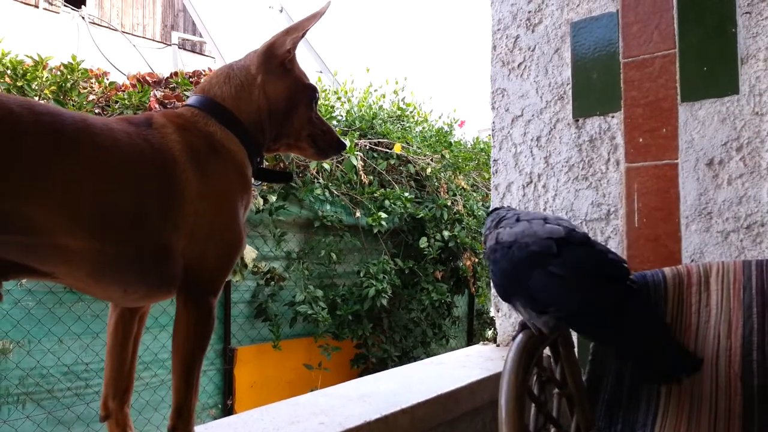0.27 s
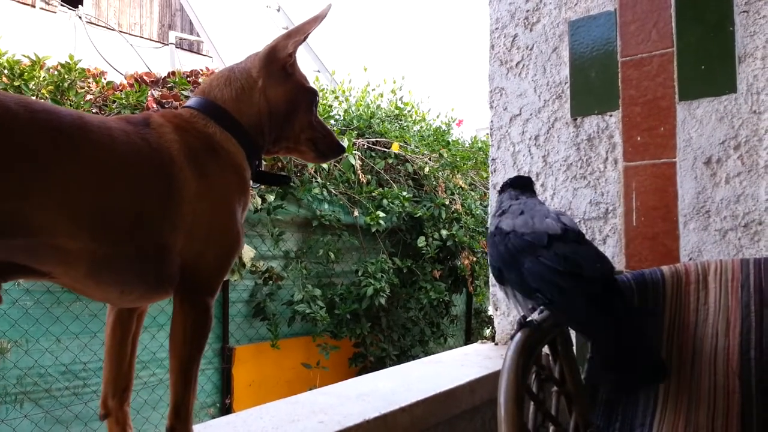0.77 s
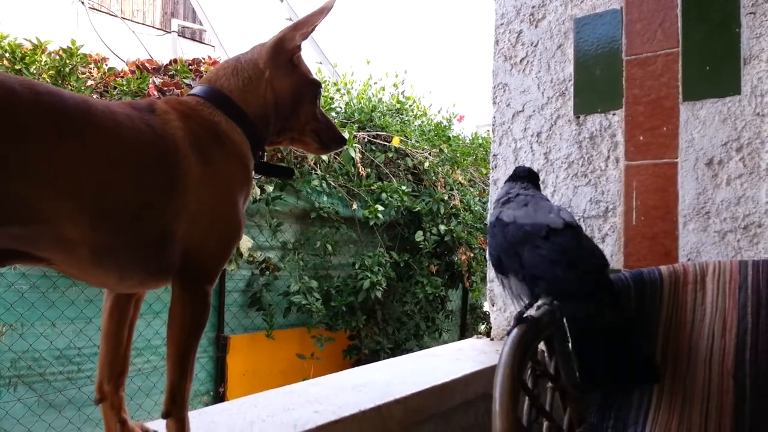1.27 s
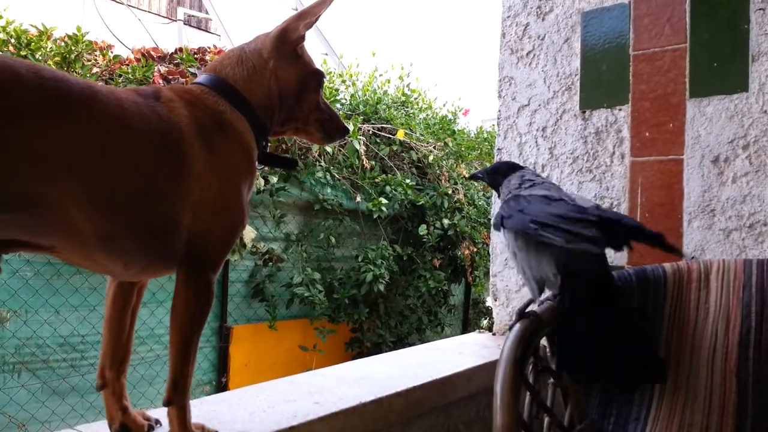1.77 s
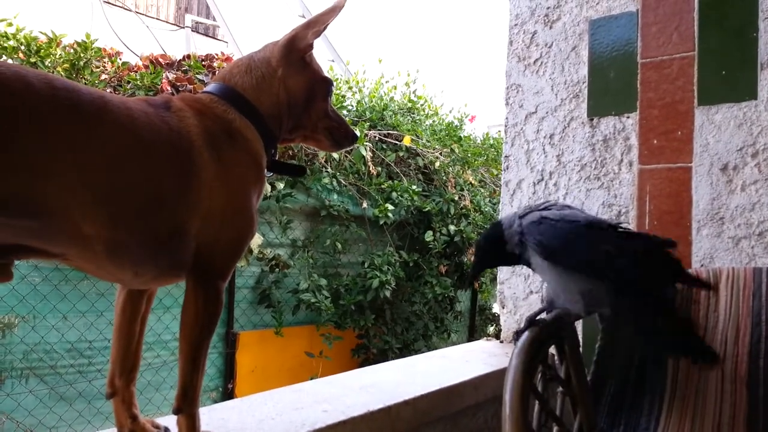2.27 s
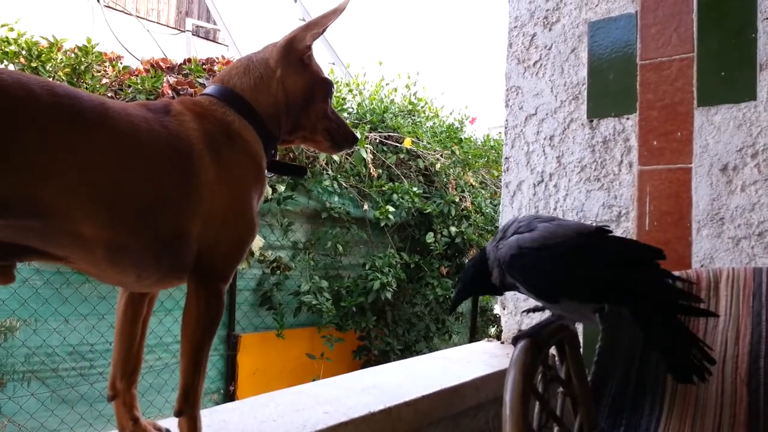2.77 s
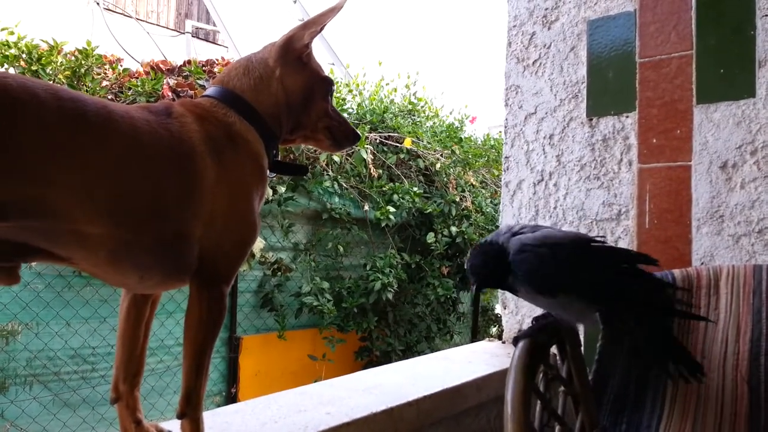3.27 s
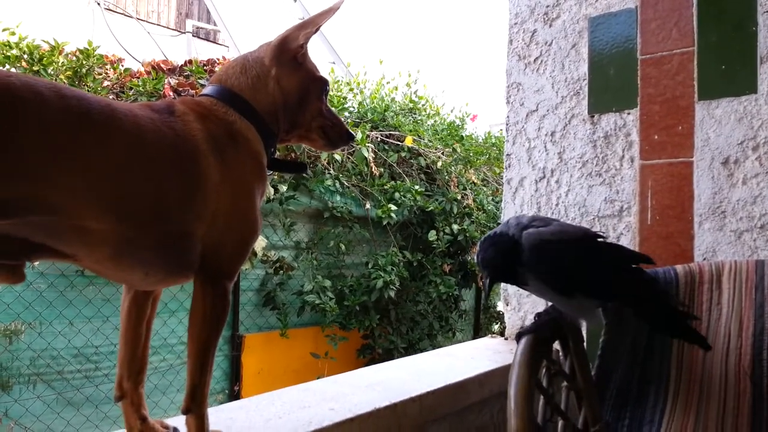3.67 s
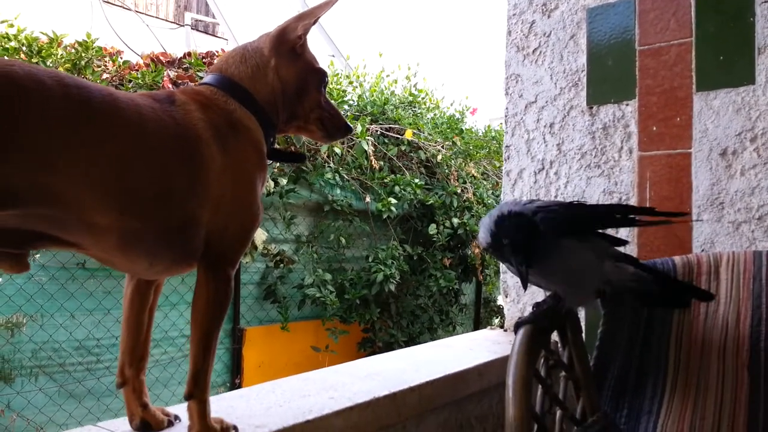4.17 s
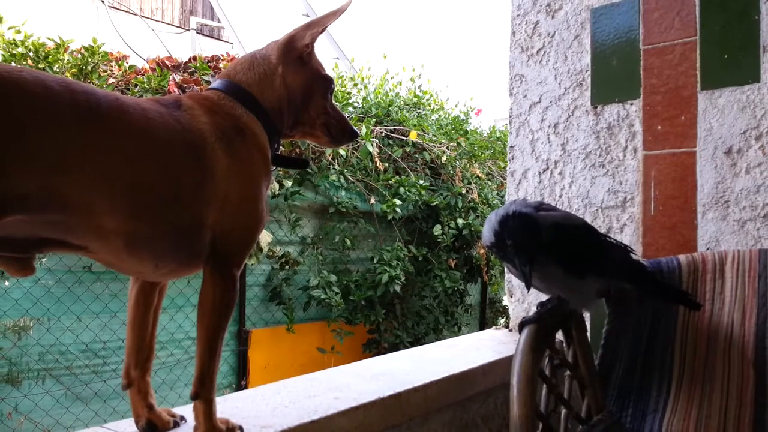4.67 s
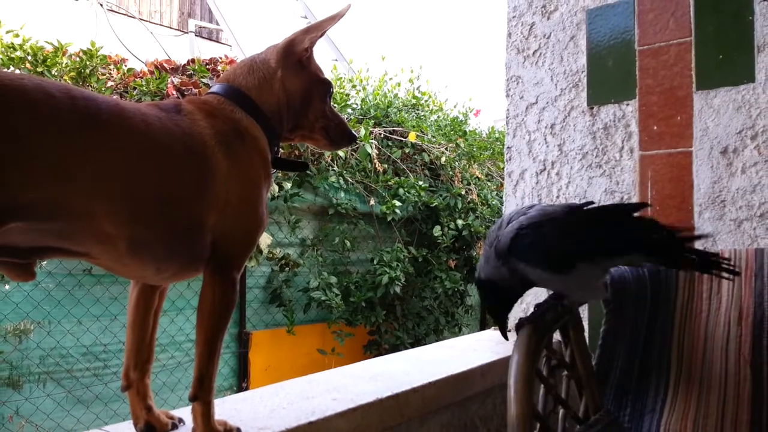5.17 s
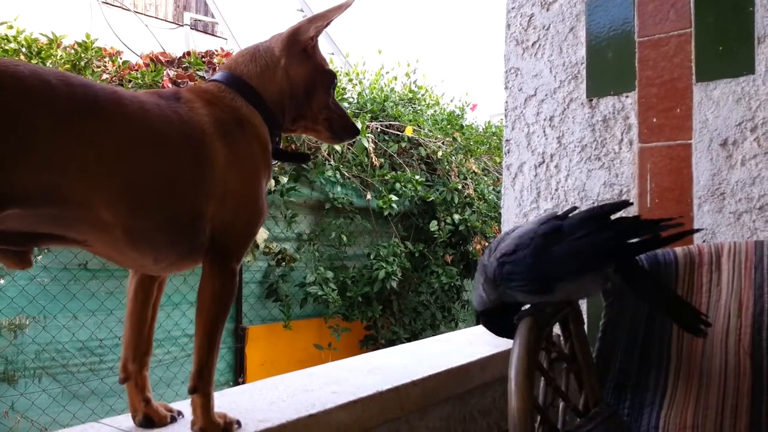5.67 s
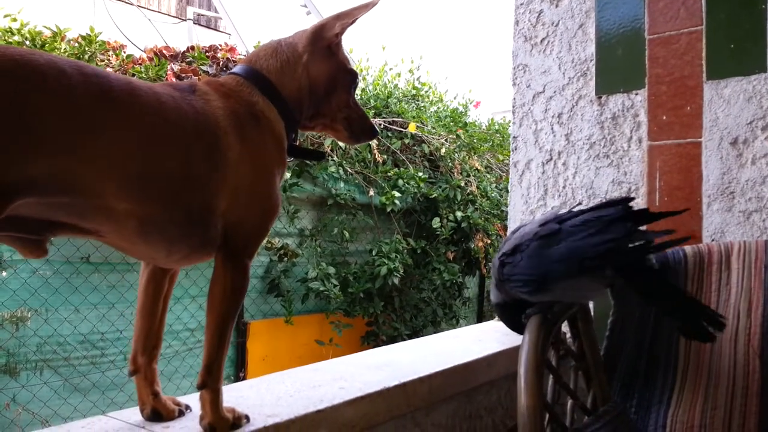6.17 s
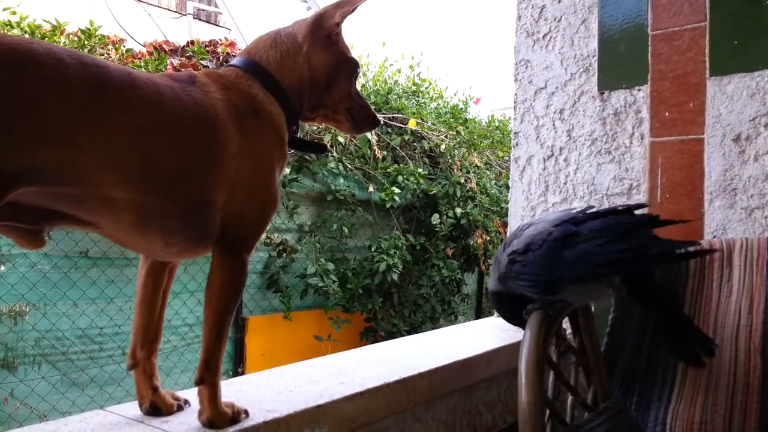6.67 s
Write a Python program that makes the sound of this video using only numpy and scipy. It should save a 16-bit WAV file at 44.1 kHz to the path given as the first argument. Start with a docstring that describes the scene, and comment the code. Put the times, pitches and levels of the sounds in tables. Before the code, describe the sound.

On a balcony, close to the microphone, a crow shifts on a wicker chair. Soft feather rustles and small claw clicks come first, then a pair of loud, dry knocks, and another pair shortly after. A quieter stretch of rustling follows, before a busier burst of pecks, scrapes and dull frame thumps. Faint far traffic and steady hiss lie underneath, with a short diffuse echo.

```python
"""Over far traffic and even microphone hiss, both filtered noise, a crow shifts on a wicker chair on a balcony.
Feathers rustle first, as dense coloured grains; claws and beak then knock the cane, clicks ringing its modes.
Louder knocks come in pairs near 2.5 and 2.9 s; from about 5 s the bird pecks again and its weight jolts the frame.
From 5.4 s the beak also scrapes the weave, as dense slips on the same modes; near 5.96 s the low noise rises too.
Throughout, the balcony answers with a short diffuse tail of decaying noise."""
import sys
import numpy as np
from scipy import signal
from scipy.fft import rfft, irfft, next_fast_len
from scipy.io import wavfile
from scipy.ndimage import uniform_filter1d

SR = 44100
rng = np.random.default_rng(int(sys.argv[2]) if len(sys.argv) > 2 else 0)


def level_to_linear(level):
    """Convert decibel levels to linear amplitude factors, elementwise."""
    exponent = np.asarray(level, float) / 20
    return 10 ** exponent


def master(y):
    """Save y as 16-bit WAV."""
    cut = np.clip(np.atleast_2d(y).T, -1, 1)
    pcm = np.round(cut * 32767)  # scale
    wavfile.write(sys.argv[1], SR, pcm.astype(np.int16))


N = 305613
TOP_HZ = 14600   # surroundings, rubbing and tail end here
SIDE = np.array([[1], [-1]])   # left, right


def rms_one(x):
    """Normalisation: scale to unit root mean square."""
    return x / np.sqrt(np.mean(x ** 2) + 1e-20)


def at_hz(points, hz):
    """Logarithmic pitch scale: interpolate (frequency [Hz], value) points over log frequency."""
    point_hz, values = np.array(points).T
    return np.interp(np.log(hz), np.log(point_hz), values)


def drift(rate):
    """Slow random modulation: normal draws at the given rate [1/s], joined by straight lines."""
    steps = rng.standard_normal(int(N / SR * rate) + 3)
    return np.interp(np.arange(N) / SR * rate, np.arange(len(steps)), steps)


def coloured(x, gain):
    """Linear filtering: multiply the spectrum by a gain given as a function of frequency [Hz]."""
    size = next_fast_len(N + SR)
    hz = np.maximum(np.arange(size // 2 + 1) * SR / size, 1)
    return irfft(rfft(x, size) * gain(hz), size)[..., :N]


def grains(per_s, spread_db):
    """Shot noise: random clicks of uneven size and sign."""
    sizes = level_to_linear(spread_db * np.minimum(rng.exponential(1, N), 4))
    signs = rng.choice([-1, 1], N)
    return sizes * signs * (rng.random(N) < per_s / SR)


def strokes(rows, rise_db_per_s, fall_db_per_s):
    """Exponential envelopes: strokes rise, hold and fall at steady dB rates, and add in power."""
    t = np.arange(N) / SR
    power = 0
    for s, held_s, db in rows:
        before_s = np.maximum(s - t, 0)
        after_s = np.maximum(t - s - held_s, 0)
        down_db = rise_db_per_s * before_s + fall_db_per_s * after_s
        power = power + level_to_linear(db - down_db) ** 2
    return np.sqrt(power)


def ring(clicks, hz, t60):
    """Damped resonance: clicks set a mode ringing; a bending strand radiates little below its pitch."""
    radius, w = level_to_linear(-60 / (t60 * SR)), 2 * np.pi * hz / SR
    highpass = [1, -2 * np.exp(-w / 2), np.exp(-w)]   # double real pole
    push = signal.lfilter([1, -2, 1], highpass, clicks + 1e-18)
    return signal.lfilter([.5, 0, -.5], [1, -2 * radius * np.cos(w), radius * radius], push)


# spectrum of the surroundings: (frequency [Hz], relative gain [dB])
AIR_SPECTRUM = [(18, -40), (30, -17.5), (80, -7.5), (161, -2), (208, -0.5), (418, -4.5), (1180, -8),
                (1270, -9.5), (2490, -15), (2900, -15.5), (4870, -18), (6300, -21), (10800, -19.5),
                (14400, -21.5)]
# left-right likeness, negative values played as none: (frequency [Hz], likeness [1])
AIR_LIKENESS = [(60, 0.48), (180, 0.5), (550, 0.42), (1650, 0.018), (4970, -0.11), (15000, -0.31)]
# balance of the surroundings: (frequency [Hz], left over right [dB])
AIR_BALANCE = [(60, 3.5), (180, 3.5), (550, -1.5), (1650, -3), (4970, -5), (15000, -4)]
# slow level of the low background, with a brief rise as the chair is scraped near 5.96 s:
# (time [s], level [dB])
LOW_BACKGROUND = [(0.0, -53), (2.5, -54.5), (3.2, -54.5), (5.4, -56), (5.96, -53.5), (6.4, -56), (6.7, -55),
                  (6.93, -52)]


def surroundings(hiss_hz=2000, hiss_db=-53.5):
    """Partially coherent noise: the low background changes slowly in level, while the hiss above stays even."""
    def shape(hz):
        return level_to_linear(at_hz(AIR_SPECTRUM, hz) + at_hz(AIR_BALANCE, hz) * SIDE / 2) * (hz < TOP_HZ)

    def alike(hz):
        return np.clip(at_hz(AIR_LIKENESS, hz), 0, 1)

    shared, apart = rng.standard_normal((2, N))
    air = coloured(shared, lambda hz: shape(hz) * np.sqrt(1 + alike(hz)))
    air += coloured(apart, lambda hz: shape(hz) * np.sqrt(1 - alike(hz)) * SIDE)   # opposite signs
    lows = coloured(air, lambda hz: 1 / (1 + (hz / hiss_hz) ** 2))
    hiss = air - lows
    scale = 1 / np.sqrt(np.mean(lows ** 2))   # one scale for both, set by the lows
    low_level = level_to_linear(np.interp(np.arange(N) / SR, *np.transpose(LOW_BACKGROUND)))
    return scale * low_level * lows + level_to_linear(hiss_db) * scale * hiss


# decay of the balcony's tail by band: (centre frequency [Hz], t60 [s])
BALCONY_DECAY = [(300, 0.44), (700, 0.22), (1500, 0.26), (3000, 0.072), (5000, 0.18), (8000, 0.15),
                 (13000, 0.16)]


def balcony(x, gap_s=0.00045, level_db=-7.5):
    """Diffuse reverberation: walls, floor and weave scatter sound into a tail that dies band by band,
    unlike at each port."""
    age = np.arange(SR // 2) / SR
    tail = 0
    for hz, t60 in BALCONY_DECAY:
        band = signal.butter(1, [hz / 1.45, hz * 1.45], "band", fs=SR, output="sos")
        noise = signal.sosfilt(band, rng.standard_normal((2, len(age))))
        tail = tail + noise * level_to_linear(-60 * age / t60)
    tail = tail * (1 - np.exp(-age / gap_s))   # soft onset
    response = rms_one(tail) / np.sqrt(len(age))
    return level_to_linear(level_db) * signal.fftconvolve(x, response, axes=1)[:, :N]


# balance of the chair at the two ports: (frequency [Hz], left over right [dB])
CHAIR_BALANCE = [(60, -13), (130, 0), (290, -3), (640, -3), (1410, -5), (3100, -10.5), (6820, -9.5),
                 (15000, 1)]
# phase by which the left port leads: (frequency [Hz], phase [rad])
LEFT_LEAD = [(300, .1), (1000, 0.38), (2500, 1.42), (4100, 1.47), (5250, 2.4), (6700, 4.67), (9100, 5.75),
             (12200, 8.25)]


def toward_microphones(x):
    """Interchannel level and phase difference: most bands favour the right port; the left leads in phase."""
    def port(hz):
        level = level_to_linear(at_hz(CHAIR_BALANCE, hz) * SIDE / 2 + 1.5)
        return level * np.exp(.5j * at_hz(LEFT_LEAD, hz) * SIDE)

    return coloured(x, port)


# feathers brush as the bird turns and flicks its wings: (full from [s], held [s], relative level [dB])
RUSTLES = [(0.07, .005, -61), (0.155, 0.021, -58.5), (0.475, .01, -54), (0.495, 0.022, -48.5),
           (0.55, .01, -50), (0.585, 0.034, -57.5), (0.66, .16, -61), (1.068, .1, -53.5),
           (1.275, 0.062, -59.5), (1.645, 0.1, -52.5), (1.79, 0.11, -61), (2.116, 0.052, -53),
           (2.215, .005, -57), (2.36, 0.036, -59.5), (3.0, 0.087, -62.5), (3.2, .01, -68),
           (3.268, 0.06, -55), (3.45, .09, -64), (4.01, 0.08, -56.5), (4.15, 0.069, -59),
           (4.55, 0.036, -66), (4.654, 0.004, -48), (4.742, .01, -61.5), (4.915, 0.12, -57.5),
           (5.06, 0.023, -55.5), (5.15, 0.15, -63), (5.315, .01, -56)]
# colour of the barbs before a low cut: (frequency [Hz], relative gain [dB])
FEATHER_COLOUR = [(530, -33), (900, 5), (1030, 7), (1420, -3.5), (2230, 1.5), (3180, -2), (4760, -1),
                  (10000, -13), (14000, -12)]


def rustles():
    """Friction noise: fine barbs rub as dense grains with a fluttering level."""
    barbs = coloured(grains(9000, 2.7), lambda hz: level_to_linear(at_hz(FEATHER_COLOUR, hz)) / (1 + (1500 / hz) ** 2))
    flutter = level_to_linear(2.0 * drift(40))
    envelope = strokes(RUSTLES, rise_db_per_s=598, fall_db_per_s=270)
    return flutter * envelope * rms_one(barbs)


# modes of the chair, shared with contacts(): (frequency [Hz], relative level [dB], nominal t60 [s])
CHAIR_MODES = [(307.5, 1, 0.11), (486, -3.5, 0.045), (725, 2.5, 0.027), (986, 6, 0.032), (1142, 1.5, 0.043),
               (1451, -2.5, 0.052), (1828, 0.5, 0.021), (2344, -2, 0.019), (2620, -4, 0.027),
               (3068, -2.5, 0.026), (3564, -2.5, 0.026), (3710, -3, 0.016), (4160, -1, 0.027),
               (4582, 1, 0.018), (4780, -7, 0.018), (5040, -2, 0.024), (5714, 1, 0.0087),
               (6250, -3.5, 0.0089), (7330, -1.5, 0.0057), (7930, -1.5, 0.0035), (10040, 1, 0.0027),
               (10280, -7.5, 0.0033), (11270, -11.5, 0.0028), (12640, -10.5, 0.0045)]
# the beak drags over the weave: (full from [s], held [s], relative level [dB])
SCRAPES = [(5.42, 0.057, -55.5), (5.475, 0.0055, -53.5), (5.607, 0.0032, -45.5), (5.658, 0.025, -49.5),
           (5.7, 0.023, -56), (5.76, 0.0045, -54), (5.875, 0.012, -39), (5.955, 0.081, -43),
           (6.08, 0.03, -49.5), (6.15, .14, -58.5)]


def scrapes(slips_per_s=2500):
    """Stick-slip excitation: dense small slips of the beak excite the chair modes."""
    slips = grains(slips_per_s, 2.5) * level_to_linear(1.8 * drift(90))   # the beak catches and lets go
    # (frequency [Hz], lift of the modes [dB])
    tilt = [(300, -3), (460, 1.5), (800, 6), (1200, 0), (1800, -20), (2400, 14), (3100, 11.5),
            (3750, 5.5), (4800, 7.5), (5600, -15), (6500, -2), (9500, -3), (12000, -16)]
    sound = 0
    for hz, db, t60 in CHAIR_MODES:
        sound = sound + level_to_linear(db + at_hz(tilt, hz)) * ring(slips, hz, 0.77 * t60)   # shorter ringing
    envelope = strokes(SCRAPES, rise_db_per_s=690, fall_db_per_s=380)
    return envelope * rms_one(sound)


# pitch of the strand under claw or beak: (from [s], frequency [Hz])
STRANDS = [(0.0, 3100), (0.555, 4720), (1.5, 4000), (2.2, 4600), (2.35, 3230), (2.8, 4020), (4.9, 5200),
           (5.0, 3420), (5.3, 4500), (5.63, 3130), (5.82, 4440), (6.0, 4460), (6.3, 1430), (6.45, 2940)]


def strand_db(s, hz, lift_db=6, width_octaves=.07):
    """Local resonance: modes near the pitch of the strand touched at that time are lifted."""
    own_hz = [pitch_hz for start, pitch_hz in STRANDS if start <= s][-1]
    octaves_off = np.log2(hz / own_hz)
    return lift_db * np.exp(-.5 * (octaves_off / width_octaves) ** 2)


# claw and beak contacts, colour relative to the mid modes:
# (time [s], relative peak [dB], low cane [dB], bright crack [dB], rattle length [s])
CONTACTS = [(0.496, -39.5, -4, -5.5, 0.0042), (0.5336, -37, -17, -3.5, 0.0074),
            (0.5407, -30, -13, -0.5, 0.004), (0.5658, -24, -14, 2.5, 0.0052),
            (1.7265, -35.5, -12, 2, 0.0064), (2.221, -39, -36, 2, 0.0065), (2.404, -36.5, -7, 3, 0.015),
            (2.4543, -9.5, -3, 7.5, 0.0041), (2.4964, -14, -10.5, 7, 0.0054), (2.772, -49, -9, 0.5, 0.004),
            (2.87, -45, -1, 1, 0.0079), (2.889, -19.5, -13, 5.5, 0.0015), (2.918, -12, -12, 9.5, 0.0019),
            (3.056, -46, -3, -1.5, 0.0034), (3.1195, -46.5, -6, -6.5, 0.004),
            (4.974, -37.5, -12, 8, 0.0059), (5.0195, -44.5, -16.5, -5.5, 0.0032),
            (5.312, -43, -11.5, 11.5, 0.004), (5.3863, -34, 1, -5, 0.016), (5.3923, -39, 2, -13, 0.011),
            (5.5763, -24.5, -8, 9, 0.0047), (5.5964, -35.5, -1, 7, 0.01), (5.663, -39, -20, -20, 0.0061),
            (5.7164, -36.5, 2.5, -12.5, 0.0045), (5.766, -32, -4, 2, 0.015), (5.786, -30, -1.5, 10, 0.0048),
            (5.8587, -11, -8, 10, 0.0056), (6.0463, -27, -13, 8, 0.01), (6.055, -23.5, 0, 2, 0.008),
            (6.363, -45.5, 6, 4.5, 0.0031), (6.5057, -15.5, -2.5, 13.5, 0.0049),
            (6.5087, -15.5, -9.5, -14, 0.0049), (6.514, -14.5, -7, 12, 0.0035),
            (6.757, -36.5, -15, 8.5, 0.015), (6.762, -30, 0, 8.5, 0.016), (6.814, -42.5, -4, 11, 0.0083),
            (6.8297, -28.5, -4, 7, 0.0054)]
# the bird's weight jolts the frame, which thumps on its lowest modes: (time [s], relative peak [dB])
JOLTS = [(0.535, -42), (0.567, -52), (2.4543, -45), (2.8712, -48), (2.9184, -57), (4.9778, -40.5),
         (5.3947, -47.5), (5.576, -44.5), (5.5978, -47), (5.768, -46), (5.7847, -43), (5.831, -47),
         (5.8618, -32), (5.884, -35.5), (6.048, -48), (6.0593, -35.5), (6.5054, -40.5), (6.515, -31),
         (6.7644, -40.5), (6.816, -49)]
# colour of a jolt over the modes: (frequency [Hz], relative level [dB])
JOLT_COLOUR = [(320, -8.5), (460, -5), (720, -9), (1000, -13.5), (1500, -40)]


def blows_on_chair(low_mode_db=-31, jolt_rattle_s=0.01):
    """Modal excitation: every blow as (time [s], relative peak [dB], colour over modes, rattle length [s])."""
    blows = []
    for s, db, low_db, crack_db, rattle_s in CONTACTS:
        colour = [(500, low_mode_db),   # one level shared by all contacts; stronger thumps are in JOLTS
                  (950, low_db - 22.0), (1250, low_db), (1800, low_db + 2.0), (2600, 0), (5500, 0),
                  (7500, crack_db), (13000, 1.31 * crack_db)]
        blows.append((s, db, colour, rattle_s))
    return blows + [(s, db, JOLT_COLOUR, jolt_rattle_s) for s, db in JOLTS]


def contacts(rattle_db=-12.5, level_db=2.5, scatter_db=2.06, detune=0.036, slip_share=0.069,
             smear_hz=900, typical_s=0.005):
    """Modal synthesis: a click with a dying rattle of strands rings modes that vary with the spot struck.
    Also gives each blow as the whole damped weave takes it up: the same colour without the ringing."""
    out, size = np.zeros((2, N)), SR // 10
    age = np.arange(size) / SR
    rows = blows_on_chair()
    slips = rng.standard_normal((len(rows), size))
    marks = rng.random((len(rows), size))
    spots = rng.standard_normal((len(rows), len(CHAIR_MODES), 2))
    for (s, peak_db, colour, rattle_s), slip, mark, spot in zip(rows, slips, marks, spots):
        rattle_gain = level_to_linear(rattle_db) * rattle_s / typical_s   # long rattles are also the stronger ones
        force = rattle_gain * slip * (mark < slip_share) * np.exp(-age / max(rattle_s, .0005))
        force[0] = 1   # the blow itself lands
        knock = 0
        for k, ((hz, db, t60), (stronger, higher)) in enumerate(zip(CHAIR_MODES, spot)):
            gain = (-1) ** k * level_to_linear(db + at_hz(colour, hz) + strand_db(s, hz))
            gain = gain * level_to_linear(scatter_db * stronger) * np.sqrt(t60)   # energy goes with ring time
            rung = ring(force, hz * (1 + detune * higher), t60)
            knock = knock + gain * rms_one(rung)
        # same energy, modes smeared
        power = uniform_filter1d(np.abs(rfft(knock)) ** 2, int(smear_hz * size / SR))
        blow = np.roll(irfft(np.sqrt(power), size), SR // 1000)   # pulse centred 1 ms in
        scale = level_to_linear(peak_db + level_db) / np.abs(knock).max()
        start = round(s * SR)
        out[:, start:start + size] += (scale * np.array([knock, blow]))[:, :N - start]
    return out


def scene():
    """Superposition: direct sound of chair and bird, their diffuse tail, and the surroundings."""
    knocks, blows = contacts()
    rubbing = coloured(scrapes() + rustles(), lambda hz: hz < TOP_HZ)
    reverberant = balcony(toward_microphones(blows + rubbing))
    tail = coloured(reverberant, lambda hz: (hz < TOP_HZ) / (1 + (250 / hz) ** 2))
    return toward_microphones(knocks + rubbing) + tail + surroundings()


def low_pass(x):
    """Removes everything above the highest recorded frequency."""
    return signal.sosfilt(signal.butter(12, 15890, fs=SR, output="sos"), x)


def record(dry):
    """Amplitude limiting: the converter stops at full scale."""
    mix = np.clip(dry, -1, 1)
    return low_pass(mix)


dry = scene()
out = record(dry)
master(out)
```